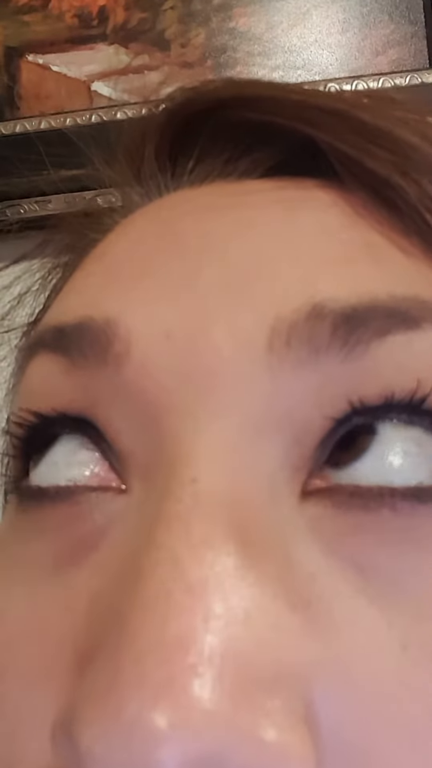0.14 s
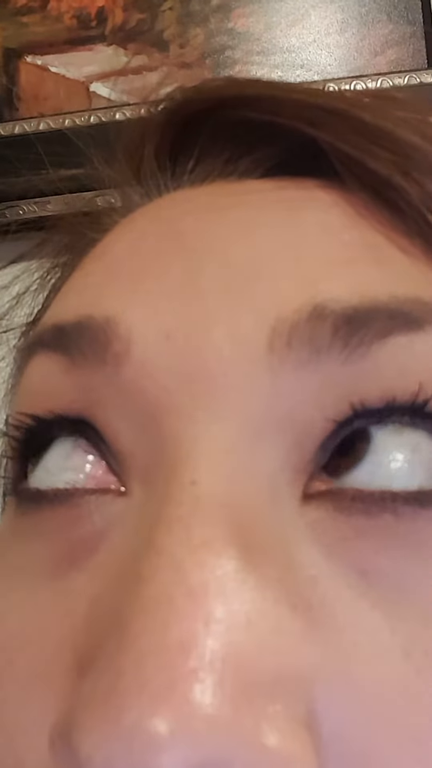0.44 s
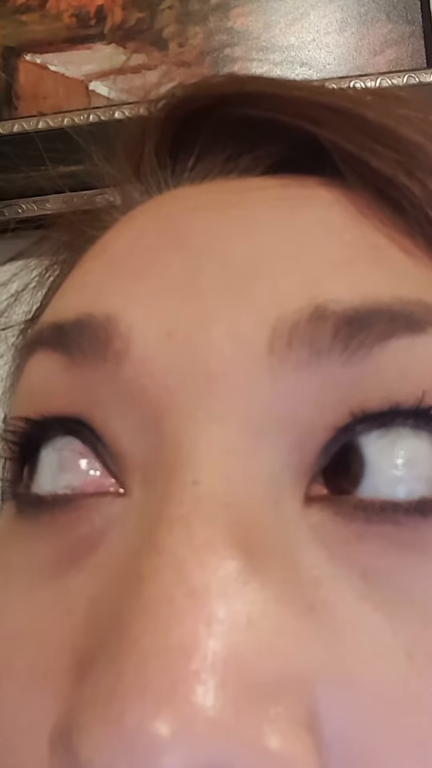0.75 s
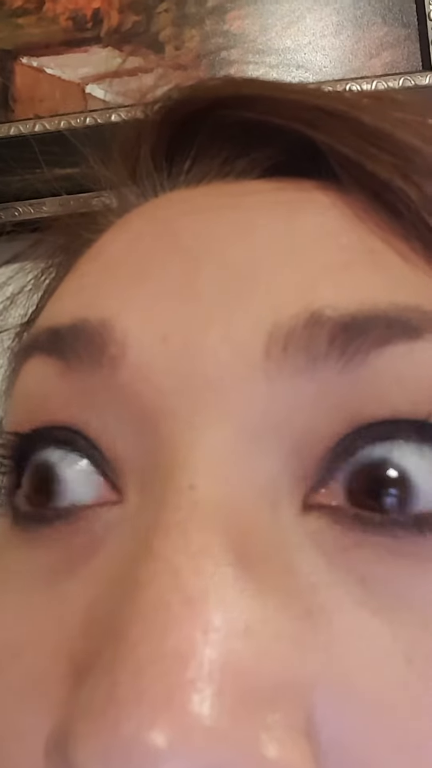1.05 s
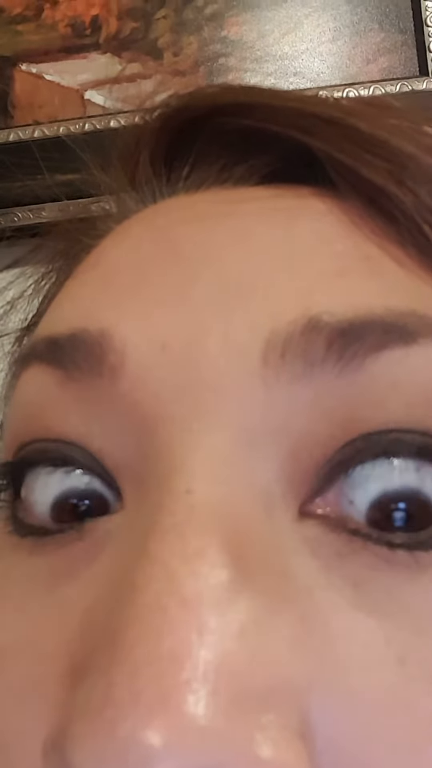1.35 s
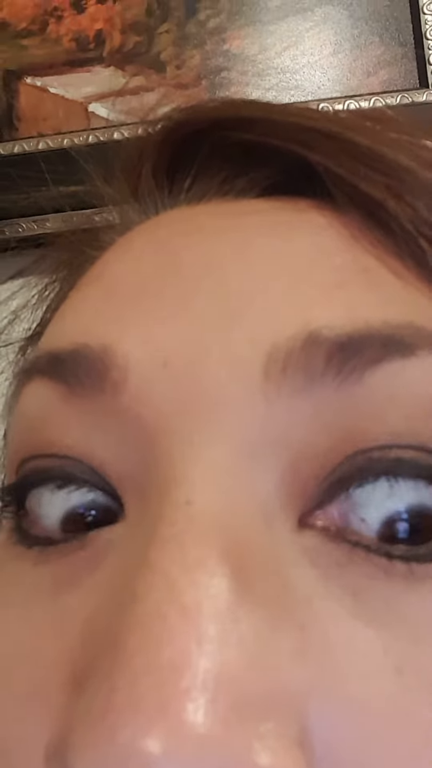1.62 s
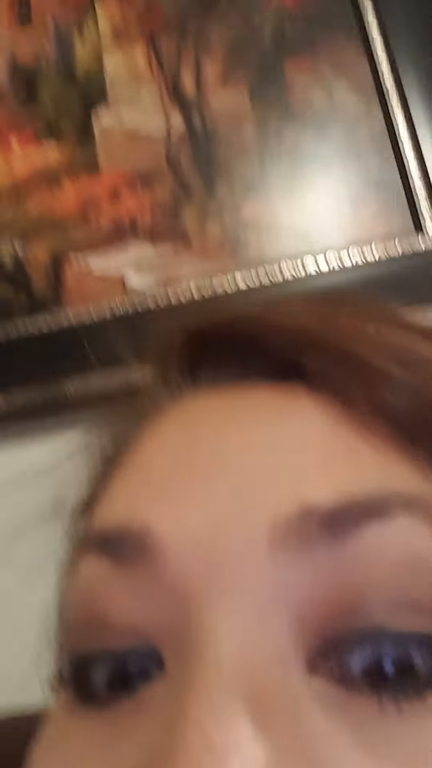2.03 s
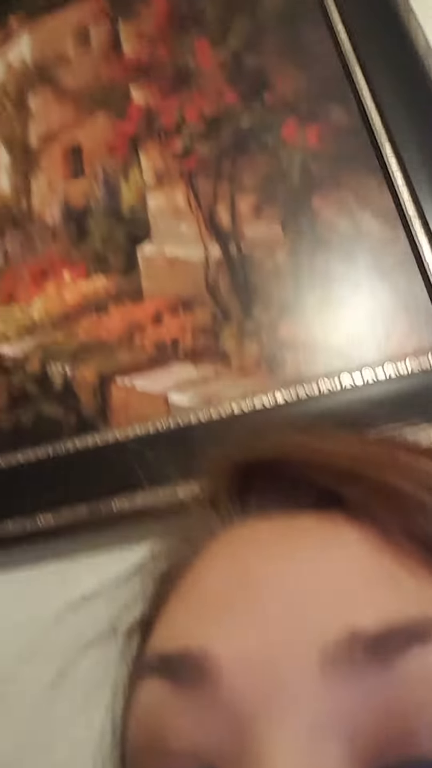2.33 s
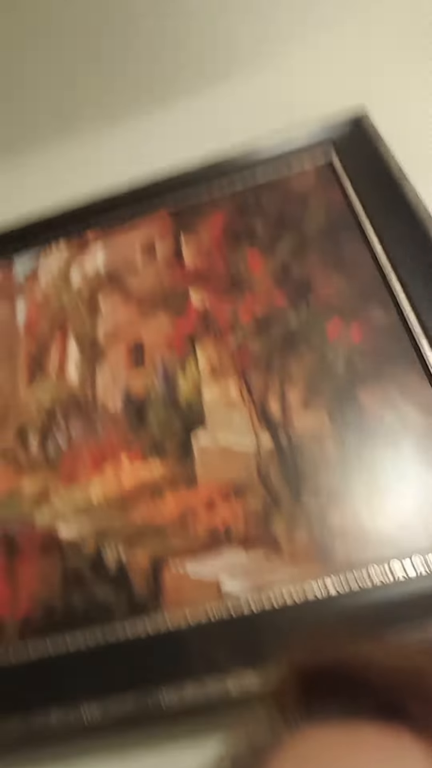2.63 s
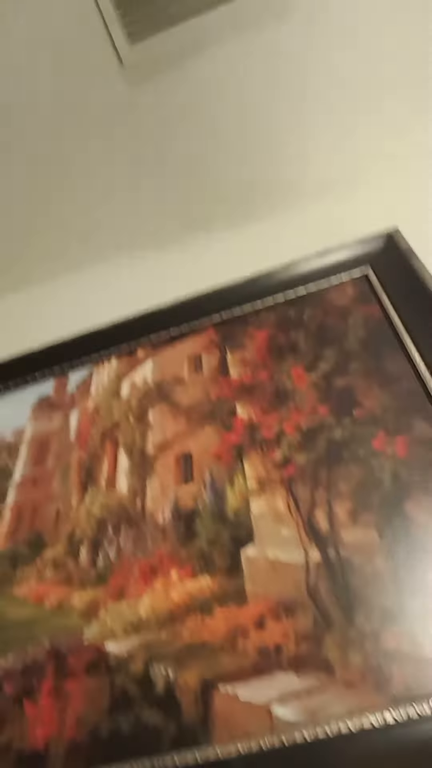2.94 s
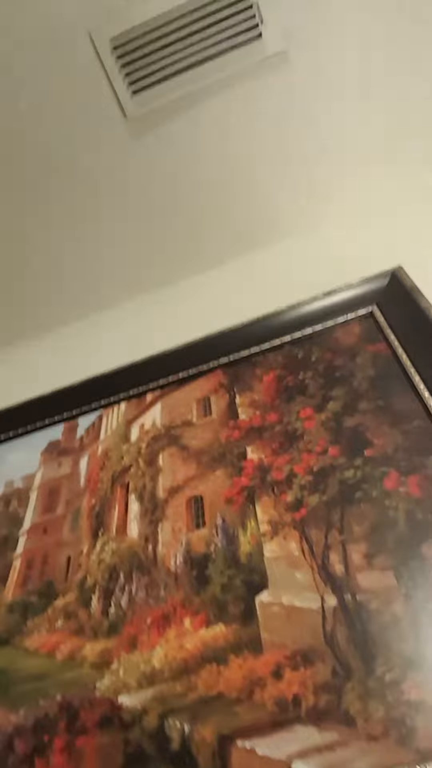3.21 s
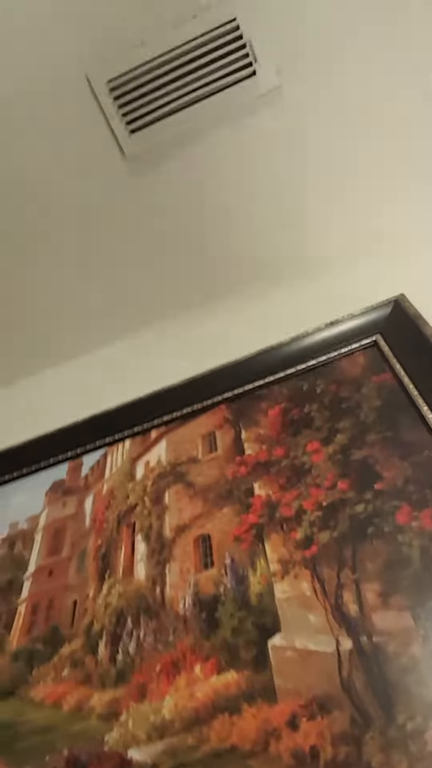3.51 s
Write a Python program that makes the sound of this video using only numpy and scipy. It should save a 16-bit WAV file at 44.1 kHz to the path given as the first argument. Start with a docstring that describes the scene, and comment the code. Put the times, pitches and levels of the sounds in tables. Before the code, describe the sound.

Loose things thump and clack above the ceiling of a quiet room, lightly at first, heaviest just before two seconds, then sparser; a low fan hum and hiss continue on a hand-held phone microphone.

```python
"""A fan motor hums in wavering low lines over air rumble and microphone hiss, both random short-time spectra.
With them a faint throbbing whine of evenly spaced lines, and treble ticks of decaying band-passed noise.
Loose things tumble above the ceiling of a quiet room: dull thuds with a woody clack, mostly room tail, made of
noise decaying band by band over damped panel modes.
Midway the hand-held phone tilts upward, which shifts the stereo picture; low handling pushes are sine bursts."""
import sys
import numpy as np
from scipy import signal
from scipy.fft import rfft, irfft
from scipy.io import wavfile
from scipy.ndimage import uniform_filter1d

SR = 44100
rng = np.random.default_rng(int(sys.argv[2]) if len(sys.argv) > 2 else 0)


def unload_wav(signal):
    """Save mono or channel-first audio to the path in sys.argv[1] as 16-bit WAV at rate SR, clipped to [-1, 1]."""
    wavfile.write(
        sys.argv[1],
        SR,
        np.round(np.clip(np.atleast_2d(signal).T, -1, 1) * 32767).astype(np.int16),
    )


def voltage_ratio(level):
    """Linear amplitude factor for a level in decibels (scalar or array-like)."""
    return 10 ** (np.asarray(level, float) / 20)


N = 161847
LEAD_S = .003  # sound through the structure starts softly just ahead of the peak


def evened(x):
    """Scales to rms 1."""
    return x / np.sqrt(np.mean(x ** 2) + 1e-20)


def read(points, hz, col=1):
    """Reads a table on a log-frequency axis."""
    p = np.array(points)
    return np.interp(np.log(hz + 1), np.log(p[:, 0] + 1), p[:, col])


def add(mix, start_s, sound):
    """Mixes a stereo sound in at start_s."""
    part = mix[:, round(start_s * SR):][:, :sound.shape[1]]
    part += sound[:, :part.shape[1]]


def drift(top_rate_hz, count):
    """Slow random curves of rms 1, each a sum of 16 sines, weaker towards the top rate."""
    rates_hz = np.geomspace(.2, top_rate_hz, 16)
    coarse_t = np.arange(0, N + 256, 256) / SR
    cycles = rates_hz[:, None] * coarse_t + rng.random((count, 16, 1))
    sines = np.sin(2 * np.pi * cycles) / np.sqrt(rates_hz)[:, None]
    t = np.arange(N) / SR
    return np.array([evened(np.interp(t, coarse_t, curve)) for curve in sines.sum(1)])


def colour(points, hz):
    """Magnitude spectrum of mean power 1 from a table in dB."""
    gain = voltage_ratio(read(points, hz))
    return gain / np.sqrt(np.mean(gain ** 2))


def ports(a, b, hz, s):
    """Two microphone ports from two spectra: likeness, lag, balance and colour by frequency and phone tilt."""
    # Likeness of the ports. Each row: frequency in Hz, share of a in the right port (0 to 1).
    likeness = [(60, .99), (370, 0.97), (520, 0.48), (1400, 0.3), (3000, 0.29), (7000, 0.18), (15000, .05)]
    # Port balance. Each row: frequency in Hz, left over right in dB.
    balance = [(60, 1.2), (130, 1.4), (280, -1.5), (950, 1.1), (2200, 2), (4500, 1.5), (15000, 1.3)]
    # Colour change once the phone is tilted. Each row: frequency in Hz, gain in dB.
    tilted_colour = [(300, 1), (600, 0), (1500, -1), (2800, 3), (5000, 0), (9000, -3.5), (12500, -.5)]
    tilt_start_s, tilt_end_s = 1.93, 2.434
    lag_before_s, lag_after_s = 0.000309, .0001  # right port behind left

    tilted = np.interp(s, (tilt_start_s, tilt_end_s), [0, 1])
    same = np.clip(read(likeness, hz), 0, 1)
    side = voltage_ratio(read(balance, hz) / 2)
    lag_s = lag_before_s + (lag_after_s - lag_before_s) * tilted
    left = a * np.exp(2j * np.pi * hz * lag_s) * side
    right = (same * a + np.sqrt(1 - same ** 2) * b) / side
    return np.array([left, right]) * voltage_ratio(read(tilted_colour, hz) * tilted)


def air():
    """Air rumble and microphone hiss: random short-time spectra with faint patches and swell."""
    # Rumble and hiss spectrum. Each row: frequency in Hz, relative level in dB.
    air_spectrum = [(15, -33), (52, -8), (88, -1.5), (112, -8.5), (170, -10), (364, -18.5), (569, -30.5),
                    (1240, -27), (2000, -34.5), (3500, -40.5), (6620, -47), (9200, -46.5), (15700, -44)]
    rms_db, patch_db, swell_db = -53.5, 0.96, -0.77
    frames, hz = N // 512 + 5, np.fft.rfftfreq(2048, 1 / SR)[:, None]
    a, b, c, d, patches = rng.standard_normal((frames, 1025, 5)).T
    patches = uniform_filter1d(patches, 20, 0)  # over frequency
    patches = evened(uniform_filter1d(patches, 7, 1))  # over time
    s = np.arange(frames) * 512 / SR
    swell = np.interp(s, np.arange(N) / SR, drift(6.7, count=1)[0])
    gain = voltage_ratio(read(air_spectrum, hz) + patch_db * patches + swell_db * swell)
    z = ports(a + 1j * b, c + 1j * d, hz, s) * gain
    noise = signal.istft(z, nperseg=2048, noverlap=1536)[1][:, :N]
    return voltage_ratio(rms_db) * evened(noise)


def hum():
    """Low motor lines, each a sine wavering in frequency and level."""
    # Hum lines. Each row: mean frequency in Hz, rms waver in Hz.
    hum_lines = [(62.6, .35), (100.8, .3), (120.02, .05), (139.0, .4), (177, .6)]
    # Hum strength as the phone moves through the standing waves.
    # Each row: time in seconds, level of each of the five hum lines in dB, lowest line first.
    hum_levels = np.array([(0, -53.5, -55.5, -54, -57, -70.5), (.9, -53.5, -56, -54.5, -54.5, -64),
                           (1.5, -53.5, -53, -53.5, -55.5, -67), (2.1, -52.5, -56.5, -58, -55, -71),
                           (2.6, -65, -59.5, -53, -56.5, -73), (3.0, -58, -57.5, -54, -57.5, -64),
                           (3.67, -61, -59, -51.5, -56, -72)])
    flutter_db = 2.1
    t = np.arange(N) / SR
    wander, flutter = drift(2.42, count=len(hum_lines)), drift(8.9, count=len(hum_lines))
    out = 0
    for k, (hz, waver_hz) in enumerate(hum_lines):
        cycles = np.cumsum(hz + waver_hz * wander[k]) / SR + rng.random()
        phasor = np.exp(2j * np.pi * cycles)
        level_db = np.interp(t, hum_levels[:, 0], hum_levels[:, k + 1]) + flutter_db * flutter[k]
        out = out + np.sqrt(2) * voltage_ratio(level_db) * ports(phasor, 0, hz, t).real
    return out


def whine():
    """A thin electronic tone in the top octave: evenly spaced lines in step, so it throbs."""
    # Rms level of each line in dB, lowest line first.
    line_levels_db = [-98, -94.5, -93.5, -102]
    lowest_hz, spacing_hz, peak_s = 10853, 29.3, .0075
    t = np.arange(N) / SR - peak_s
    return sum(np.sqrt(2) * voltage_ratio(db) * np.cos(2 * np.pi * (lowest_hz + k * spacing_hz) * t)
               for k, db in enumerate(line_levels_db))


def ticks():
    """Faint treble ticks at random moments: band-passed noise with sudden onset and exponential decay."""
    rate_per_s, floor_db, spread_db, decay_s = 19, -80.5, 4, 0.0053
    band_hz = (7800, 12800)
    size = voltage_ratio(spread_db * np.minimum(rng.exponential(1, N), 3)) * (rng.random(N) < rate_per_s / SR)
    fade = signal.lfilter([1], [1, -np.exp(-1 / (decay_s * SR))], size)
    band = signal.butter(2, band_hz, "bandpass", fs=SR, output="sos")
    noise = evened(signal.sosfilt(band, rng.standard_normal((2, N))))
    return voltage_ratio(floor_db) * fade * noise


def knock(s, clack_db, thud_db, edge_db, pitch):
    """A blow rings the ceiling panel and fills the room: sharp first arrival, lumpy tail dying band by band."""
    # Spectra of thud, clack and bright edge. Each row: frequency in Hz, relative level in dB.
    thud_spectrum = [(24, -27), (40, 0.5), (128, -3), (400, -3), (560, -6), (760, -15), (1400, -23),
                     (2640, -120)]
    clack_spectrum = [(500, -2.5), (900, -6), (1300, -7.5), (1750, -5), (2400, -6.5), (2800, -12.5),
                      (3500, -38.5), (7000, -62)]
    edge_spectrum = [(2200, -7), (3300, -0.5), (4500, -7.5), (6500, -17.5), (9000, -21), (15500, -31)]
    # Room tail. Each row: band centre in Hz, decay by 60 dB in seconds, rise time constant in seconds.
    room_tail = [(104, 0.39, 0.057), (265, 0.36, 0.013), (610, 0.39, 0.0076), (1370, 0.42, 0.0048),
                 (2980, 0.42, 0.0025), (5860, 0.36, 0.00089), (12000, 0.62, 0.0027)]
    # Panel modes. Each row: nominal frequency in Hz, relative level in dB, decay by 60 dB in seconds.
    panel_modes = [(148, 0, .3), (210, -1, .22), (240, -3, .2), (282, -1, .18), (322, 0, .18),
                   (405, 1, .16), (480, -3, .12), (620, -6, .1)]
    crack_gain, crack_s = 0.71, 0.0079  # early sound over the tail
    lumps_db, lump_s = 1.5, 0.005  # uneven reflections
    edge_snap_db, clack_snap_db, snap_s = 7, 3, .002  # first arrival over the tails, its decay time
    panel_db, mode_scatter_db = -5, 4.5
    heavy_db, heavy_slope = -54.5, 1  # louder thuds drive modes below 260 Hz harder (dB per dB per octave)

    size = 14400
    t, hz = np.arange(size) / SR, np.fft.rfftfreq(size, 1 / SR)
    thud = voltage_ratio(thud_db)
    thud_mag = thud * colour(thud_spectrum, hz / pitch)
    clack, edge = colour(clack_spectrum, hz), colour(edge_spectrum, hz)
    mag = np.sqrt(thud_mag ** 2 + (voltage_ratio(clack_db) * clack) ** 2 + (voltage_ratio(edge_db) * edge) ** 2)
    a, b, lumps = rng.standard_normal((3, size))
    z = ports(rfft(a), rfft(b), hz, s) * mag
    lumps = voltage_ratio(lumps_db * evened(uniform_filter1d(lumps, round(lump_s * SR))))
    body = lumps + crack_gain * np.exp(-t / crack_s)

    out, centres = 0, np.log([row[0] for row in room_tail])
    for k, (_, t60_s, rise_s) in enumerate(room_tail):
        share = np.interp(np.log(hz + 1), centres, np.arange(len(room_tail)) == k)
        shape = (1 - np.exp(-t / rise_s)) * voltage_ratio(-60 * t / t60_s) * body
        out = out + irfft(z * share, size) * shape

    snap_mag = voltage_ratio(edge_db + edge_snap_db) * edge + voltage_ratio(clack_db + clack_snap_db) * clack
    snap = irfft(ports(rfft(b), rfft(a), hz, s) * snap_mag, size)
    out = out + snap * np.exp(-(t - LEAD_S) / snap_s) * (t >= LEAD_S)

    heavy = heavy_slope * max(thud_db - heavy_db, 0)
    luck = rng.standard_normal((len(panel_modes), 2))
    ring = 0
    for (f, db, t60_s), (level_luck, pitch_luck) in zip(panel_modes, luck):
        level_db = db + mode_scatter_db * level_luck + heavy * max(np.log2(260 / f), 0)
        mode_hz = f * np.sqrt(pitch) * (1 + 0.02 * pitch_luck)
        ring = ring + voltage_ratio(level_db - 60 * t / t60_s) * np.sin(2 * np.pi * mode_hz * t)
    ring = rfft(ring * thud * voltage_ratio(panel_db) / np.sqrt(len(panel_modes)))
    out = out + irfft(ports(ring, 1j * ring, hz, s), size) * np.minimum(t / 0.003, 1)
    return out * np.minimum(1, 4 * (1 - t / t[-1]))  # fade over the last quarter


def knocks():
    """The listed knocks and a random scatter of faint rattles, each rattle a weak knock."""
    # Each row: time in seconds, clack level in dB, thud level in dB, bright edge level in dB,
    # thud pitch as a ratio.
    blows = [(0.1723, -52.5, -52.5, -69.5, 1), (0.192, -67, -51, -77, 0.68), (0.3693, -54, -49.5, -75, .95),
             (0.5038, -48, -54, -68, .9), (0.588, -53.5, -58, -72, .9), (0.668, -49, -64, -67, 1),
             (1.0252, -54, -43, -66, 1.03), (1.0496, -57, -50, -70, 1.05), (1.1302, -62, -60, -74, 1.1),
             (1.2652, -54.5, -54.5, -62.5, 1.1), (1.2943, -57.5, -59, -73, 0.79),
             (1.4277, -62.5, -59, -76, 1.2), (1.4606, -58, -49, -73, 1.06), (1.4993, -55, -48, -70, 1.1),
             (1.5308, -53.5, -43, -69, 1.02), (1.5702, -49, -48.5, -63.5, 0.85),
             (1.6968, -51, -38.5, -59, 1.1), (1.7247, -48.5, -39.5, -79, 1.02),
             (1.7545, -50, -43, -52, 1.1), (1.8, -55, -64, -65.5, 1.1), (2.0548, -47, -44.5, -61.5, 1.15),
             (2.1649, -52, -47.5, -68, 0.97), (2.3466, -55.5, -52.5, -63, 0.98),
             (2.393, -58, -46, -65.5, 1.2), (2.7021, -53.5, -44.5, -63.5, 0.93),
             (2.748, -49, -42.5, -57, 0.98), (3.0027, -59, -53, -62.5, 1.05),
             (3.2922, -61.5, -55, -70, .99), (3.506, -60.5, -66, -70.5, .99),
             (3.5978, -55, -51.5, -68, 1.3), (3.6119, -52, -51, -69, 0.86), (3.634, -48.5, -48, -59, 1.1)]
    rattles_per_s, max_clack_db, max_thud_db, spread_db = 14, -69.5, -62.5, 1.5
    out = np.zeros((2, N))
    for row in blows:
        add(out, row[0] - LEAD_S, knock(*row))
    for u, v, w in rng.random((round(rattles_per_s * N / SR), 3)):
        s = u * N / SR
        add(out, s, knock(s, max_clack_db - spread_db * v, max_thud_db - spread_db * w, -82.5, 0.99))
    return out


def handling():
    """Short sub-bass pushes as the hand moves the phone: windowed sine bursts, stronger on the left."""
    # Each row: start in seconds, level in dB, frequency in Hz.
    hand_pushes = [(2.34, -57, 22), (2.675, -50, 27), (3.25, -57, 20)]
    cycles = 2.2
    out = np.zeros((2, N))
    for s, db, hz in hand_pushes:
        t = np.arange(0, cycles / hz, 1 / SR)
        push = np.hanning(len(t)) * np.sin(2 * np.pi * hz * t)
        add(out, s, voltage_ratio(db) * push * voltage_ratio([[1.], [-1.]]))
    return out


def scene():
    """Knocks overhead, air, hum, whine, ticks and handling."""
    return knocks() + air() + hum() + whine() + ticks() + handling()


def top_cut(x):
    """Nothing passes above the cut-off."""
    return signal.sosfilt(signal.butter(12, 15880, fs=SR, output="sos"), x)


def record(dry):
    """Band limit by a linear-phase low-pass, then a small constant converter offset."""
    top_hz, offset = 15750, -.0006
    limited = signal.oaconvolve(dry, signal.firwin(401, top_hz, fs=SR)[None], "same")
    return top_cut(limited + offset)


dry = scene()
out = record(dry)
unload_wav(out)
```